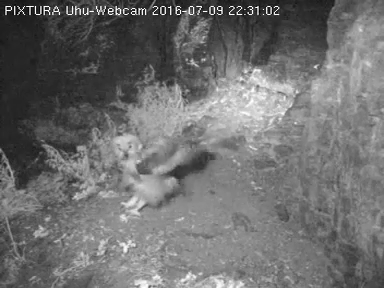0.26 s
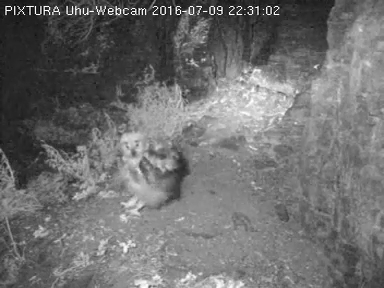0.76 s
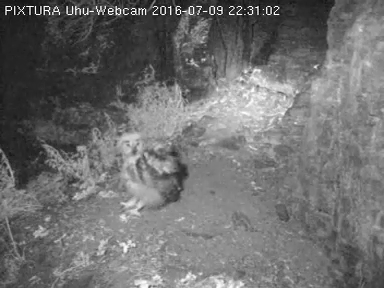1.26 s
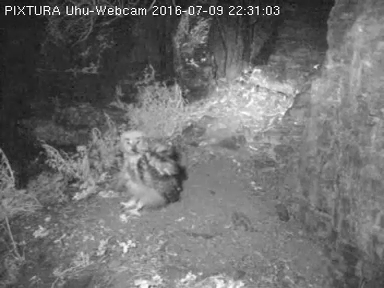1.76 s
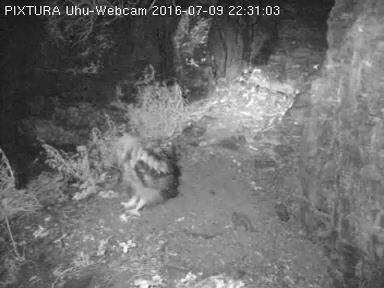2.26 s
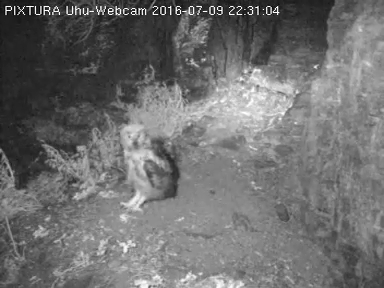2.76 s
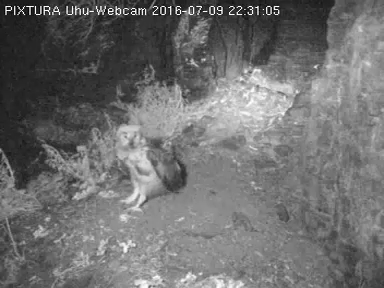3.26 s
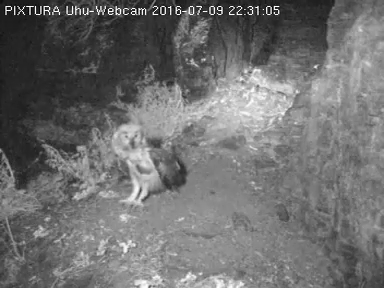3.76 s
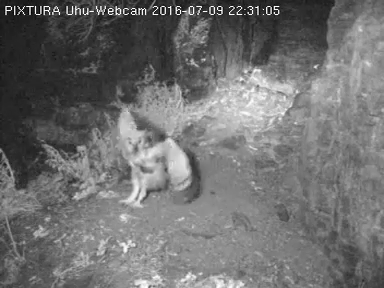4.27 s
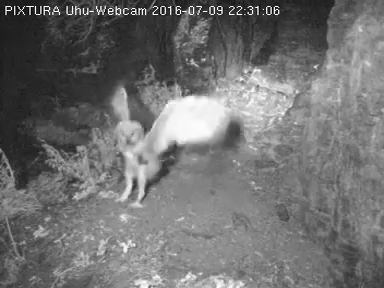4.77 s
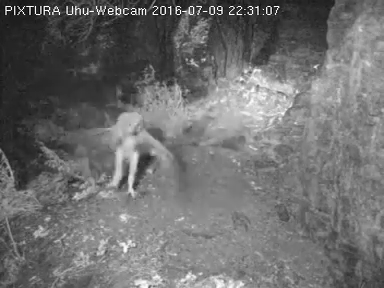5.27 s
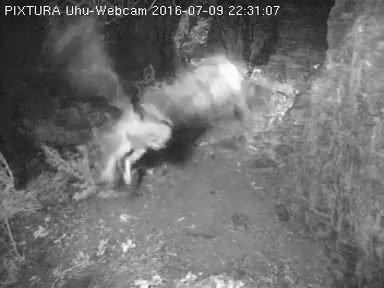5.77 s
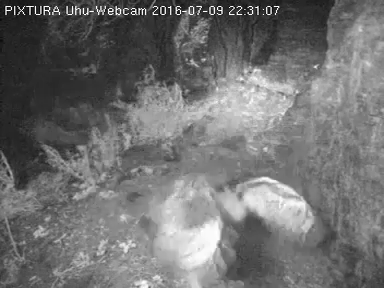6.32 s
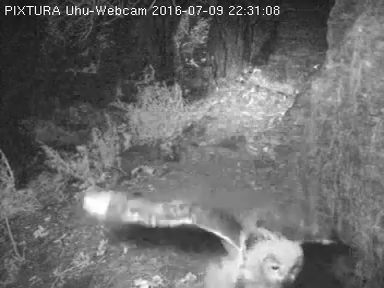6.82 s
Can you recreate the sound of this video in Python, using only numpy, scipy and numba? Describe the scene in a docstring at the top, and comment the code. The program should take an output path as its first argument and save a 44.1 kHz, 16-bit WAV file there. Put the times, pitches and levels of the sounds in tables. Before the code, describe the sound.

A steady low electrical hum, faint hiss and a hollow, gently wavering rumble run for the whole seven seconds. At about 1.3 seconds a young owl gives a hoarse, hissing begging screech, high and breathy, roughly a third of a second long. It swells quickly, carries a rough whistling edge and cuts off with a tiny falling squeak. From 2.0 to 2.5 seconds the bird shuffles quietly: a quick cluster of gritty scrapes, claw scratches and soft thumps. Three more calls of the same kind come at about 3.0, 4.5 and 6.4 seconds, each a little louder than the first, the one at 4.5 with brief whistling catches. The rumble swells slightly near 4.9 seconds and again at the end. The owl sounds fairly near, in mono, with a very short reflection from the surrounding rock.

```python
"""On a rock ledge at night, a young eagle owl begs four times.
In each call turbulent air excites the resonances of windpipe and beak; the lower beak resonance
slides down as the beak shuts, and the rock reflects the sound. The bird shuffles and preens after
the first call, over mains hum, a low rumble and hiss."""
import sys
import numpy as np
from scipy import signal
from scipy.fft import rfft, irfft
from scipy.io import wavfile
from numba import njit

SR = 44100
rng = np.random.default_rng(int(sys.argv[2]) if len(sys.argv) > 2 else 0)


def wav_record(signal):
    """Record a signal, one row per channel, as 16-bit PCM in the file named by sys.argv[1]."""
    frames = np.transpose(np.atleast_2d(signal))
    bounded = np.clip(frames, -1, 1)
    # unit amplitude maps onto the largest positive 16-bit level
    quanta = np.round(bounded * 32767).astype(np.int16)
    wavfile.write(sys.argv[1], SR, quanta)


N = 310905
T = np.arange(N) / SR

# begging calls, levels relative: (hardest push [s], beak wide after it [s], beak shut after it [s],
#   opening rate [dB/s], rattle depth [dB], hiss [dB], rush [dB], sizzle [dB], windpipe [dB],
#   lower resonance [Hz], level [dB], whistled share [0-1], squeak [dB], final slide [share],
#   main resonance [Hz], width [Hz], arch [share], level [dB], crescendo [dB/s], whistled share [0-1],
#   overtone [Hz], level [dB])
CALLS = [(1.320, 0.029, 0.16, 125, 1, -9.5, -54.5, -64, -51.5, 2360, -42.5, 0.36, -44, 0.23, 3370, 320, .02, -47.5, 24, .35, 3720, -49.5),
         (3.008, -.013, .190, 214, 1.8, -8, -50.5, -60.5, -51, 2254, -41.5, 0.06, -45, 0.31, 3173, 302, 0.0201, -42, 32, 0.45, 4050, -43.7),
         (4.466, -.040, .184, 227, 2.5, -8, -52, -58.5, -47.5, 2287, -43, 0.3, -44.5, 0.3, 3130, 320, .045, -40, 12, .36, 3920, -42),
         (6.371, -0.013, .170, 182, 0.5, -7.5, -50, -59.5, -49, 2310, -45, 0.06, -43.5, 0.33, 3304, 340, .08, -39.5, 4, 0.55, 4070, -46.5)]
# windpipe resonances: (frequency [Hz], width [Hz], relative level [dB])
WINDPIPE_MODES = [(962, 69, 0.5), (658, 41, -13.5), (1490, 185, -3)]
# whistles where the air catches inside a call: (time [s], frequency [Hz], relative level [dB])
CATCHES = [(1.384, 1465, -45.5), (1.421, 3340, -47), (2.985, 2933, -45), (4.474, 3750, -39),
           (4.492, 2640, -41)]
# air hissing past the beak: (frequency [Hz], spectral level [dB])
BEAK_HISS = [(200, -15), (450, -6), (1200, 0), (2200, 10.5), (3500, 7), (4400, 5), (5200, -0.5), (6000, -5),
             (7000, -7.5), (8300, -4), (9250, -7.5), (10500, -13.5), (12400, -20)]
# soft rush from the open throat: (frequency [Hz], spectral level [dB])
THROAT_RUSH = [(250, -6), (600, 2.5), (900, 1.5), (1200, 2.5), (1600, 3.5), (2500, 1), (4500, -5),
               (5400, -1.5), (6100, -6), (7000, -8.5), (9000, -49)]
# scuffs of claws and feathers: (time [s], level [dB], rise [s], decay [s], thump [dB], scratch [dB])
SCUFF_EVENTS = [(1.997, -54, 0.0035, 0.012, 4, -3), (2.040, -59.5, .0041, 0.037, 6.5, -3),
                (2.097, -53, 0.0088, 0.023, 4.5, -12), (2.118, -59, 0.0046, 0.02, 3, -8),
                (2.127, -53.5, 0.0011, 0.006, 5, -14), (2.168, -58, .002, 0.0089, 4, -10),
                (2.219, -48.5, 0.0008, 0.0037, -3, 0), (2.225, -52.5, 0.001, 0.005, 4, -3),
                (2.357, -53.5, 0.0033, 0.016, 0, 1), (2.430, -56.5, 0.0051, 0.0082, -11, -1)]
# gritty scrape: (frequency [Hz], spectral level [dB])
GRIT_SPECTRUM = [(150, -8), (400, 1), (600, 4), (1200, -2), (2500, -8), (3600, -17), (5000, -17),
                 (9000, -59)]
# thump of the bird's weight: (frequency [Hz], spectral level [dB])
THUMP_SPECTRUM = [(25, -17), (65, 3.5), (130, -2.5), (280, -8.5), (410, -1), (560, -12), (1500, -68)]
# crisp scratch of a claw: (frequency [Hz], spectral level [dB])
CLAW_SPECTRUM = [(600, -17), (1500, 1.5), (2500, 2), (3500, -6), (4800, -12), (9000, -49)]
# reflections from the rock: (delay [s], level [dB])
ROCK_ECHOES = [(.0043, -19), (.0079, -10), (0.0133, -9), (0.0206, -12.5)]
# mains hum: (harmonic [number], level [dB])
HUM_HARMONICS = [(1, -69), (2, -77), (3, -59.5), (5, -78), (7, -79.5), (9, -92.5), (11, -85), (13, -77.5)]
# steady background: (frequency [Hz], spectral level [dB])
NIGHT_SPECTRUM = [(20, -17.5), (38, 2), (58, 11.5), (88, 12.5), (110, 8.5), (200, 2), (295, -4), (410, 2.5),
                  (600, -1.5), (1200, -3.5), (2500, -8), (5000, -10.5), (6500, -9), (8000, -17.5)]
# slow contour of the rumble: (time [s], level [dB])
RUMBLE_CONTOUR = [(0, -57.5), (1.2, -62), (1.6, -57.5), (2.4, -61), (4.5, -58.5), (4.85, -54), (5.5, -60),
                  (6.1, -56.5), (7.05, -54)]


def owlet(gain_db=-1.31, lead_s=.195, ring_s=.065):
    """Superposition of the four calls and the brief whistles that break through them."""
    calls = np.zeros(N)
    for row in CALLS:
        push, _, shut_after = row[:3]
        span = (T >= push - lead_s) & (T <= push + shut_after + ring_s)
        calls[span] = beg(T[span], row)
    return (calls + air_catches()) * undb(gain_db)


def beg(t, row, fade_in_s=.056, cutoff_s=.0045):
    """Source and filter: uneven puffs of air excite the windpipe and the closing beak."""
    (push, wide_after, shut_after, opening, rattle_db, hiss_db, rush_db, sizzle_db, pipe_db,
     low_hz, low_db, low_share, squeak_db, slide,
     main_hz, main_width, arch, main_db, crescendo, main_share, over_hz, over_db) = row
    # the push of air and the movement of the beak time every level
    wide, shut = push + wide_after, push + shut_after
    narrows, squeak_at = shut - .063, shut - .0243
    beak = swell(t, wide, narrows, opening, fall_db_per_s=318)
    pipe_gain = undb(pipe_db) * swell(t, push, push, 86, 69)
    low_gain = undb(low_db) * swell(t, push, push + .026, 169, 101)
    squeak_gain = undb(squeak_db) * swell(t, squeak_at, squeak_at, 163, 135)
    main_gain = beak * undb(main_db - crescendo * (narrows - np.clip(t, wide, narrows)))
    over_gain = beak * undb(over_db - 25 * np.maximum(t - push, 0))
    rush_gain = undb(rush_db) * swell(t, push - .03, shut - .089, 68, 118)
    settled = np.clip((t - push) / (narrows - push) * 2, 0, 1)  # 0 to 1 after the push
    rasp, flow = syrinx(t, rattle_db * settled)
    waver = 1 + .00788 * flutter(44.4, t)
    lower = lower_resonance(t, flow, low_hz * waver, shut, slide, low_share)
    # the main resonance arches up as the beak gapes, and turns partly from hiss to whistle
    gape = np.sin(np.pi * np.clip((t - wide) / (squeak_at - wide), 0, 1)) ** 2
    arched_hz = main_hz * waver * (1 + arch * (gape - .5))
    main = voiced(t, flow, arched_hz, main_width, main_share * settled, jitter=.0403)
    overtone = resonance(flow, over_hz * waver, width_hz=770, skirt=1.44)
    pipe = windpipe(t, rasp, push, waver)
    # broad hiss follows the effort, over the rush of the throat and the sizzle at the beak's edge
    effort = np.sqrt(low_gain ** 2 + .5 * main_gain ** 2 + over_gain ** 2 + pipe_gain ** 2)
    hiss = undb(hiss_db) * effort * flow * noise(BEAK_HISS, len(t))
    rush = rush_gain * flow * noise(THROAT_RUSH, len(t))
    sizzle = undb(sizzle_db) * beak * resonance(flow, hz=8800, width_hz=1000)
    call = np.maximum(low_gain, squeak_gain) * lower + main_gain * main + over_gain * overtone
    call += pipe_gain * pipe + hiss + rush + sizzle
    fade_in = np.clip((t - t[0]) / fade_in_s, 0, 1)
    return call * fade_in * np.exp(-np.maximum(t - shut, 0) / cutoff_s)


def syrinx(t, rattle_db, rasp_db=1.36):
    """Amplitude modulation by the flapping, slack syrinx: a fine rasp, alone and with a slower rattle."""
    rasp = unit(undb(rasp_db * flutter(900, t)))
    rattle = unit(undb(rattle_db * flutter(261.9, t)))
    return rasp, rasp * rattle


def lower_resonance(t, flow, hz, shut, slide, open_share, squeak_share=.66, slide_s=.023):
    """Flow through the narrowing beak partly locks onto a resonance, a squeak that drops steeply."""
    closing = np.clip((t - shut) / slide_s + 1, 0, 1) ** 1.5
    lock = np.interp(t, [shut - .08, shut - .05], [open_share, squeak_share])
    return voiced(t, flow, hz * (1 - slide * closing), width_hz=450, share=lock, jitter=.04)


def windpipe(t, rasp, push, waver, flat_share=.14, glide_s=.09, whistle_db=2.5, whistle_s=.03):
    """Tube resonance: the modes rise into tune, and the strongest whistles briefly at the push."""
    tuned_at = push - .082
    tuning = 1 - flat_share * np.clip((tuned_at - t) / glide_s, 0, 1)
    modes = unit(sum(undb(db) * resonance(rasp, hz * tuning, width) for hz, width, db in WINDPIPE_MODES))
    whistle = rasp * tone(WINDPIPE_MODES[0][0] * waver * (1 + .014 * flutter(500, t)))
    return modes + undb(whistle_db) * np.exp(-((t - push) / whistle_s) ** 2) * whistle


def air_catches(width_s=.011):
    """Flow-induced tones: catching air gives unsteady whistles under Gaussian envelopes."""
    wobble = 1 + .016 * flutter(700, T)
    return sum(undb(db) * np.exp(-((T - at) / width_s) ** 2) * tone(hz * wobble)
               for at, hz, db in CATCHES)


def voiced(t, flow, hz, width_hz, share, jitter):
    """Incoherent sum: a share of a resonance's power passes from noise to a rough whistle."""
    breath = resonance(flow, hz, width_hz)
    whistle = flow * tone(hz * (1 + jitter * flutter(700, t)))
    return np.sqrt(1 - share) * breath + np.sqrt(share) * whistle


def resonance(flow, hz, width_hz, skirt=2.4):
    """Forced resonance: turbulence drives a band-pass, and a second pass steepens its skirts."""
    hz = hz * np.ones(len(flow))
    ring = bandpass(flow * rng.standard_normal(len(flow)), hz, float(width_hz))
    return unit(bandpass(ring, hz, float(width_hz * skirt)))


def scuffs():
    """Friction and impact: gritty scrapes, each with a scratch of claw and a thump of body weight."""
    grain = unit(undb(1.6 * flutter(900, T)))
    grit, scratch = grain * noise(GRIT_SPECTRUM), grain * noise(CLAW_SPECTRUM)
    thump, out = noise(THUMP_SPECTRUM), np.zeros(N)
    for at, db, rise, decay, thump_db, scratch_db in SCUFF_EVENTS:
        contact = np.clip((T - at) / rise, 0, 1) * np.exp(-np.maximum(T - at - rise, 0) / decay)
        out += undb(db) * contact * (grit + undb(thump_db) * thump + undb(scratch_db) * scratch)
    return out


def ledge(x, t60_s=.22, tail_db=-10.5):
    """Reflection and scattering: close rock faces add discrete echoes and a short diffuse tail."""
    t = T[:SR // 3]
    tail = rng.standard_normal(len(t)) * np.exp(-np.log(1000) * t / t60_s) * (t > .004)
    response = undb(tail_db) * tail / np.linalg.norm(tail)
    response[0] = 1  # direct sound
    for delay, db in ROCK_ECHOES:
        response[int(delay * SR)] += undb(db)
    return signal.fftconvolve(x, response / np.linalg.norm(response))[:N]


def hum(mains_hz=50.02):
    """A harmonic series on the mains frequency, mostly odd multiples."""
    return sum(np.sqrt(2) * undb(db) * np.sin(2 * np.pi * (round(k) * mains_hz * T + rng.random()))
               for k, db in HUM_HARMONICS)


def background(night_db=-57.0, waver_db=1.65):
    """Stationary broadband noise, and narrowband noise heard as a hollow rumble that swells and ebbs."""
    night = lowpass(noise(NIGHT_SPECTRUM), hz=8100) * undb(night_db)
    rumble_db = np.interp(T, *np.transpose(RUMBLE_CONTOUR)) + waver_db * flutter(9, T)
    rumble = resonance(np.ones(N), hz=175.2, width_hz=45.3, skirt=.93)
    return night + rumble * undb(rumble_db)


def swell(t, start, end, rise_db_per_s, fall_db_per_s):
    """Exponential growth to 1 at start, a hold until end, then exponential decay."""
    return undb(-rise_db_per_s * np.maximum(start - t, 0) - fall_db_per_s * np.maximum(t - end, 0))


def undb(db):
    """Amplitude ratio of a level in decibels."""
    return 10 ** (np.asarray(db) / 20)


def unit(x):
    """Normalisation to rms 1."""
    return x / np.sqrt(np.mean(x ** 2))


def noise(points, size=N):
    """Spectral shaping of white noise by (frequency [Hz], level [dB]) points, at rms 1."""
    hz, db = np.transpose(points)
    bins_hz = np.maximum(np.fft.rfftfreq(size, 1 / SR), 1)
    gain = undb(np.interp(np.log(bins_hz), np.log(hz), db))
    return unit(irfft(rfft(rng.standard_normal(size)) * gain, size))


def flutter(per_s, t):
    """Random modulation: Gaussian values joined by straight lines."""
    knots = np.arange(t[0], t[-1] + 1 / per_s, 1 / per_s)
    return np.interp(t, knots, rng.standard_normal(len(knots)))


def tone(hz):
    """A sine of rms 1 whose phase is the integral of its frequency."""
    return np.sqrt(2) * np.sin(2 * np.pi * np.cumsum(hz) / SR)


def lowpass(x, hz):
    """Elliptic low-pass with a steep edge."""
    return signal.sosfilt(signal.ellip(8, .2, 70, hz, fs=SR, output="sos"), x)


@njit
def bandpass(x, hz, width_hz):
    """A damped oscillator with a moving centre frequency, in state-variable form."""
    y, band_state, low_state = np.empty(len(x)), 0., 0.
    for i in range(len(x)):
        step, damping = np.tan(np.pi * hz[i] / SR), width_hz / hz[i]
        band = (band_state + step * (x[i] - low_state)) / (1 + step * (step + damping))
        band_state = 2 * band - band_state
        low_state += 2 * step * band
        y[i] = damping * band
    return y


def scene():
    """Superposition of the echoed bird, hum and background, alike in both channels."""
    mono = ledge(owlet() + scuffs()) + hum() + background()
    return np.array([mono, mono])


def record(dry):
    """Band limiting removes the highest treble."""
    return lowpass(dry, hz=12500)


dry = scene()
out = record(dry)
wav_record(out)
```